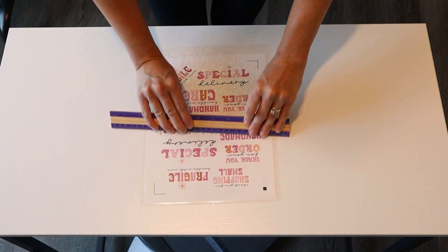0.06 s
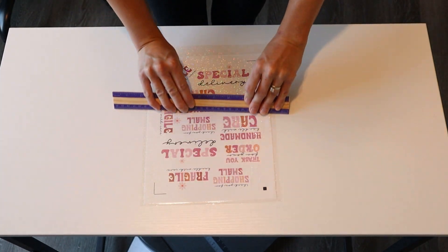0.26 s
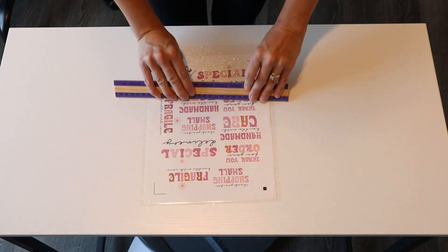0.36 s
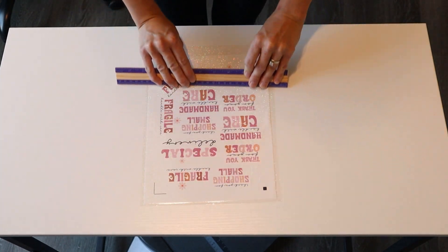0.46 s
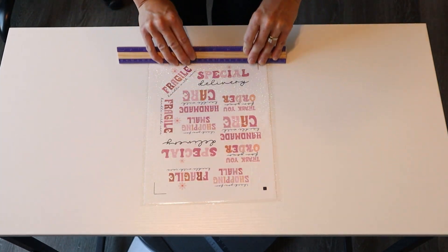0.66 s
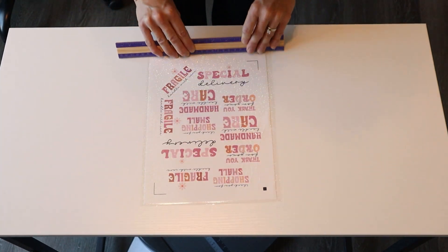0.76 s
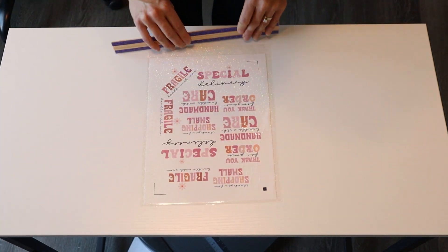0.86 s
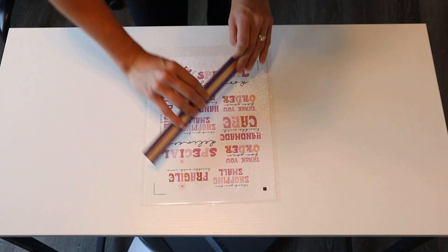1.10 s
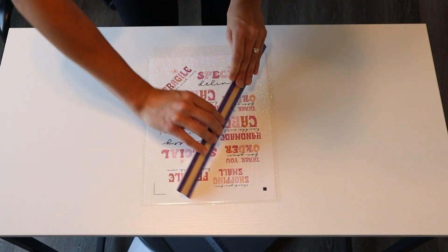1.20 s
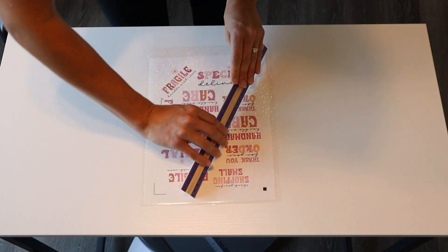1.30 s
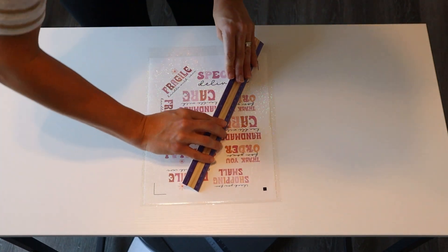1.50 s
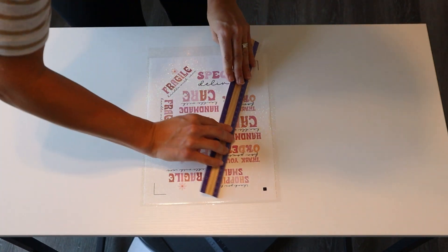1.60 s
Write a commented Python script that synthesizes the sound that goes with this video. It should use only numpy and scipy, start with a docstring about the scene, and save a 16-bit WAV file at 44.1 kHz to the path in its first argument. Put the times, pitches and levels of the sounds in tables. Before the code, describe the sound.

A ruler scrapes and hisses over plastic film on a table, juddering low, with a sharp film snap early; it clacks on lifting, then a faint lighter stroke follows. Bare echoing room, microphone above the table.

```python
"""First a plastic ruler scrapes and hisses over laminating film on a table top, in a bare, echoing room.
Friction is dense random slips through coloured pulses; ruler and table hum as unsteady sine tones.
The film snaps in bright clicks as a trapped bubble gives way; hands and ruler thud softly on the table.
At the end of the stroke the ruler clacks as it is lifted, is set down again and starts a lighter stroke.
The microphone above the table hears it all in the middle, with a wide room tail and a steady low rush."""
import sys
import numpy as np
from scipy import signal
from scipy.fft import rfft, irfft, next_fast_len
from scipy.io import wavfile
from scipy.ndimage import map_coordinates

SR = 44100
rng = np.random.default_rng(int(sys.argv[2]) if len(sys.argv) > 2 else 0)


def inscribe(sig):
    """Save sig as 16-bit PCM at rate SR to the path in sys.argv[1].

    A 1-D sig is mono; a 2-D sig holds one channel per row.
    Samples are clipped to [-1, 1] before scaling.
    """
    pcm = np.round(np.clip(np.atleast_2d(sig).T, -1, 1) * 32767)
    wavfile.write(sys.argv[1], SR, pcm.astype(np.int16))


N = 72765  # samples
LEAD = SR // 2  # samples of run-up, so that the room already sounds at time 0
TIME = np.arange(-LEAD, N) / SR


def amp(db):
    """Decibels to gain."""
    return 10 ** (np.asarray(db) / 20)


def unit(x):
    """Scaled to rms 1."""
    return x / np.sqrt(np.mean(x ** 2) + 1e-20)


def along(points, hz):
    """Values at hz, read between (Hz, value) points on a log frequency axis."""
    f, v = np.transpose(points)
    return np.interp(np.log(hz + 1), np.log(f + 1), v)


def gains(rows):
    """One gain per sample for each dB column after the time."""
    seconds, *columns = np.transpose(rows)
    return [amp(np.interp(TIME, seconds, column)) for column in columns]


def wobble(rate):
    """A smooth random curve, rate knots a second."""
    at = (TIME - TIME[0]) * rate
    knots = rng.standard_normal(int(at[-1]) + 4)
    return map_coordinates(knots, [at])


def filtered(x, response):
    """x with its spectrum multiplied by a response of frequency."""
    n = x.shape[-1]
    m = next_fast_len(n + LEAD)
    spectrum = rfft(x, m) * response(np.fft.rfftfreq(m, 1 / SR))
    return irfft(spectrum, m)[..., :n]


def pulse(spectrum, size=4096):
    """The minimum-phase pulse of a colour: its energy comes as early as possible and sums to 1."""
    hz = np.fft.rfftfreq(size, 1 / SR)
    cepstrum = irfft(np.log(amp(along(spectrum, hz))))
    # fold the cepstrum onto positive time to make the pulse causal
    cepstrum[1:size // 2] *= 2
    cepstrum[size // 2 + 1:] = 0
    wave = irfft(np.exp(rfft(cepstrum)))
    return wave / np.linalg.norm(wave)


def add(track, s, sound):
    """Mix a sound into a track from time s on."""
    part = track[..., round(s * SR):][..., :sound.shape[-1]]
    part += sound[..., :part.shape[-1]]


# Stereo width of the room at the microphone. Each row: frequency in Hz, side over mid in dB.
WIDTH = [(60, -20), (200, -8.5), (380, -9.5), (700, -6.5), (1300, -1), (2400, 2.5), (4400, 6.5), (8000, 6),
         (15000, 5.5)]


def widen(pair):
    """Two unrelated noises to left and right: narrow in the bass, wide in the treble."""
    turn = lambda hz: np.arctan(amp(along(WIDTH, hz)))
    mid, side = filtered(pair, lambda hz: np.array([np.cos(turn(hz)), np.sin(turn(hz))]))
    return np.array([mid + side, mid - side])


# Decay of the bare room. Each row: frequency in Hz, time to fall by 60 dB in seconds.
ROOM = [(100, 0.36), (300, 0.7638), (1800, 0.7767), (5000, 0.84), (10500, 0.53), (15000, 0.4638)]
BUILD_S = 0.0035  # time constant of the tail's build-up


def in_room(x, room_db):
    """The direct sound in the middle, and a fresh noise tail that builds up and dies by band."""
    hz, t, bands = signal.stft(widen(rng.standard_normal((2, SR))), SR, nperseg=256)
    decay = amp(-60 * t / along(ROOM, hz)[:, None])
    tail = signal.istft(bands * decay, SR, nperseg=256)[1]
    tail = tail * (1 - np.exp(-np.arange(tail.shape[1]) / SR / BUILD_S))
    # room_db is the energy of the tail over that of the direct sound
    response = amp(room_db) * tail / np.sqrt(np.sum(tail ** 2) / 2)
    response[:, 0] += 1
    return signal.fftconvolve(x[None], response, axes=1)


GRAINS_PER_S, GRAIN_SPREAD_DB = 5000, 2


def friction(spectrum):
    """Dense tiny slips of uneven size, coloured by what they shake."""
    happens = rng.random(len(TIME)) < GRAINS_PER_S / SR
    slips = happens * rng.standard_normal(len(TIME))
    slips = slips * amp(GRAIN_SPREAD_DB * rng.standard_normal(len(TIME)))
    return unit(signal.fftconvolve(slips, pulse(spectrum))[:len(TIME)])


def tone(hz, wander, rate):
    """An unsteady stick-slip vibration: a sine whose pitch wanders by a fraction of itself."""
    unsteady_hz = hz * (1 + wander * wobble(rate))
    return np.sqrt(2) * np.sin(2 * np.pi * np.cumsum(unsteady_hz) / SR)


# The stroke. Each row: time in seconds, level of the scrape in dB, level of the edge's hiss in dB.
STROKE = [(0, -36.5, -36.5), (.12, -45, -38.5), (.3, -42, -35), (.45, -38.5, -38.5), (.56, -40, -35.5),
          (.66, -32.5, -37.5), (.8, -36.5, -35.5), (.9, -29.5, -28.5), (.95, -45, -58), (1.19, -50.5, -57),
          (1.23, -48.5, -47.5), (1.3, -50, -61), (1.4, -57, -46), (1.47, -45.5, -63), (1.62, -46, -56.5),
          (1.65, -57, -52)]
# Colours of the scrape and of the hiss. Each row: frequency in Hz, relative level in dB per Hz.
SCRAPE = [(40, -34.5), (90, 0), (200, -6), (450, -1), (800, -5.5), (1250, 0), (2200, -7), (3500, -14.5),
          (7000, -23), (15000, -55)]
HISS = [(500, -25.5), (1800, -6.5), (3000, 0.5), (4500, -3.5), (6500, -1), (8500, -4), (11000, -0.5),
        (12500, -4.5), (14500, -19), (16000, -39)]
ROUGH_DB, ROUGH_PER_S = 2.5, 70  # unevenness of the scrape, and its knots a second
RUB_ROOM_DB = 9.5


def stroke():
    """The edge scrapes and hisses over the film: two coloured frictions, heard mostly by way of the room."""
    scrape_gain, hiss_gain = gains(STROKE)
    scrape = scrape_gain * friction(SCRAPE) * amp(ROUGH_DB * wobble(ROUGH_PER_S))
    hiss = hiss_gain * friction(HISS)
    heard = in_room(scrape + hiss, RUB_ROOM_DB)[:, LEAD:LEAD + N]
    return heard / np.hypot(1, amp(RUB_ROOM_DB))  # direct sound and tail together keep the level


# The ruler's low judder. Each row: time in seconds, level in dB.
JUDDER = [(0, -57), (.06, -38.5), (.11, -47), (.17, -51.5), (.21, -34.5), (.25, -42), (.3, -67),
          (.34, -38.5), (.42, -45), (.55, -46.5), (.72, -47), (.82, -72), (.95, -77)]
JUDDER_HZ, JUDDER_WANDER = 338.2, 0.038
# Its higher groan. Each row: time in seconds, level in dB.
GROAN = [(0, -44.5), (.2, -64), (.37, -57), (.44, -38.5), (.55, -48.5), (.73, -44.5), (.82, -75),
         (.95, -80)]
GROAN_HZ, GROAN_WANDER = 619, 0.011
# A thin squeak as the stroke gets going. Each row: time in seconds, level in dB.
SQUEAK = [(0, -51), (.1, -51), (.14, -54), (.2, -72)]
SQUEAK_HZ = 1093
# A low boom under the end of the stroke. Each row: time in seconds, level in dB.
BOOM = [(.6, -93), (.72, -45.5), (.8, -50), (.9, -58), (1, -70)]
BOOM_HZ = 69.8


def judder():
    """The dragged ruler judders, groans and squeaks by stick-slip on the table top, which booms faintly."""
    low = gains(JUDDER)[0] * tone(JUDDER_HZ, JUDDER_WANDER, rate=90)
    high = gains(GROAN)[0] * tone(GROAN_HZ, GROAN_WANDER, rate=80)
    squeak = gains(SQUEAK)[0] * tone(SQUEAK_HZ, wander=0.0056, rate=70)
    boom = gains(BOOM)[0] * tone(BOOM_HZ, wander=0.0206, rate=15)
    unsteady = amp(1.7 * wobble(44.1))  # shared flutter of level
    return ((low + high + squeak) * unsteady + boom)[LEAD:]


# Snaps of the film. Each row: start in seconds, energy of the direct click in dB.
SNAPS = [(.078, -69), (0.2227, -57), (.2283, -65), (0.2339, -57), (.235, -48), (0.2389, -31),
         (0.2401, -46.5), (.2452, -53), (0.329, -60), (0.329, -60)]
# Colour of a click. Each row: frequency in Hz, relative level in dB per Hz.
SNAP = [(100, -18.5), (400, -12), (1500, -22.5), (4000, -8.5), (6000, -7.5), (7000, -3.5), (8800, -3),
        (9900, 0), (11200, -5), (12000, -5), (14000, -23), (16000, -34)]
SNAP_RING_HZ, SNAP_RING_T60_S, SNAP_RING_DB = 10670, 0.0045, -8  # ring level is against the click
SNAP_ROOM_DB = -1


def snaps():
    """The film gives way in bright clicks, most in a quick run, each with a very short ring."""
    clicks, click = np.zeros(N), pulse(SNAP)
    t = np.arange(len(click)) / SR
    ring = np.sin(2 * np.pi * SNAP_RING_HZ * t) * amp(-60 * t / SNAP_RING_T60_S)
    click = click + amp(SNAP_RING_DB) * ring / np.linalg.norm(ring)
    click = click / np.linalg.norm(click)
    for s, db in SNAPS:
        add(clicks, s, amp(db) * np.sqrt(SR) * click)
    return in_room(clicks, SNAP_ROOM_DB)[:, :N]


# Knocks of the ruler. Each row: start in seconds, energy of the direct sound in dB,
# share of flat slap against edge clack from 0 to 1.
KNOCKS = [(.156, -58.5, 1), (.472, -56.5, 0.98), (0.599, -58, 0.65), (.651, -55, 0.15), (.862, -37, 0),
          (0.8735, -43.5, 0.03), (.914, -44.5, 0), (1.3064, -46, 0.87)]
# Colours of the edge's clack and the flat's slap. Each row: frequency in Hz, relative level in dB per Hz.
CLACK = [(30, -23), (140, -9), (220, -16.5), (500, -4), (1000, -4), (1650, 4), (1900, 0), (2250, 3),
         (3100, -4), (4400, -11), (7000, -22), (11500, -29), (15000, -51)]
SLAP = [(30, -20), (150, -16), (270, -2.5), (450, -5.5), (850, 1.5), (1150, -1), (1420, -13), (1680, 2),
        (1900, -4.5), (2300, -1.5), (3400, -12.5), (4400, -12), (5300, -22), (11000, -26.5), (15000, -47)]
# Colour of the knocks' direct sound, which leaves the table sideways. Each row: frequency in Hz, gain in dB.
SIDEWAYS = [(300, 0.5), (700, 3), (1800, -2), (3500, -1), (5500, -2.5), (11000, -0.5)]
# Ring of the table. Each row: frequency in Hz, relative level in dB, time to fall by 60 dB in seconds.
TABLE = [(251.6, -2, 0.83), (337, -4, 0.33), (697, 2.5, 0.21), (970, -4, 0.52), (1678, -4, 0.77)]
RING_DB = -2  # energy of the ring against the direct sound, for a wholly flat slap
CHATTER_T60_S, CONTACT_RISE_S = 0.017, 0.001
KNOCK_ROOM_DB = 7


def knocks():
    """Each contact chatters for a moment, echoes in the room and, the flatter it lands, rings the table."""
    track, t = np.zeros((2, N)), np.arange(SR // 2) / SR
    for s, db, flat in KNOCKS:
        body = (1 - flat) * pulse(CLACK) + flat * pulse(SLAP)
        swell = amp(-60 * t / CHATTER_T60_S) * (1 - np.exp(-t / CONTACT_RISE_S))
        chatter = rng.standard_normal(len(t)) * swell
        direct = signal.fftconvolve(chatter, np.convolve(body, pulse(SIDEWAYS)))
        direct = direct / np.linalg.norm(direct)
        echo = in_room(body, KNOCK_ROOM_DB)
        echo[:, :len(body)] -= body  # the tail alone
        ring = sum(amp(level - 60 * t / t60) * np.sin(2 * np.pi * hz * t) for hz, level, t60 in TABLE)
        ring = flat * amp(RING_DB) * ring / np.linalg.norm(ring)
        for sound in (direct, echo, ring):
            add(track, s, amp(db) * np.sqrt(SR) * sound)
    return track


# Soft low thuds of hands and ruler on the table, some under the knocks.
# Each row: centre in seconds, peak level in dB, pitch in Hz.
THUDS = [(.12, -54, 55), (.15, -51, 130), (0.227, -46, 167), (.245, -42, 70), (.885, -41, 140),
         (0.934, -43, 130), (1.26, -51, 42), (1.35, -53, 50), (1.62, -56.5, 35)]
THUD_S, THUD_WANDER = 0.02, 0.17  # half-width of the swell in seconds, wander of the pitch as a fraction


def thuds():
    """Hands and ruler bear down on the table: a few low cycles that swell and fade."""
    t, track = np.arange(N) / SR, np.zeros(N)
    for s, db, hz in THUDS:
        swell = np.exp(-.5 * ((t - s) / THUD_S) ** 2)
        track += amp(db) * swell * tone(hz, THUD_WANDER, rate=80)[LEAD:]
    return track


# Colour of the steady background. Each row: frequency in Hz, relative level in dB per Hz.
FLOOR = [(20, -14), (70, -1), (130, -3), (400, -5.5), (1000, -18), (3000, -21), (10000, -27), (15000, -46)]
FLOOR_DB = -51.5


def background():
    """The room's steady low rush: wide noise with most of its level in the bass."""
    noise = widen(rng.standard_normal((2, N)))
    return amp(FLOOR_DB) * unit(filtered(noise, lambda hz: amp(along(FLOOR, hz))))


def scene():
    """Everything at the microphone above the table."""
    return stroke() + judder() + snaps() + knocks() + thuds() + background()


# The recorder's treble. Each row: frequency in Hz, gain in dB.
MIC = [(11500, 0), (13000, -2), (14200, 0), (15600, -7.5)]
TOP_HZ = 15700  # band limit


def record(dry):
    """Peaks beyond full scale clip; the top treble rolls off and ends at the band limit."""
    return filtered(np.clip(dry, -1, 1), lambda hz: amp(along(MIC, hz)) * (hz < TOP_HZ))


dry = scene()
out = record(dry)
inscribe(out)
```